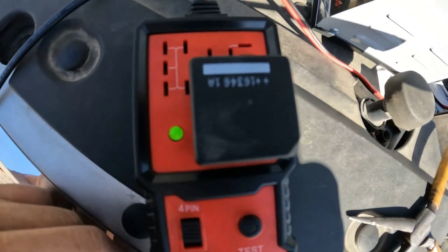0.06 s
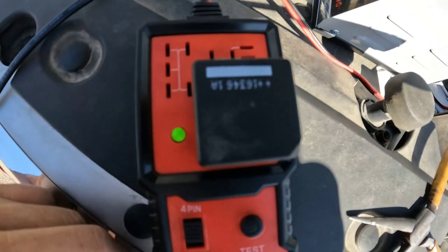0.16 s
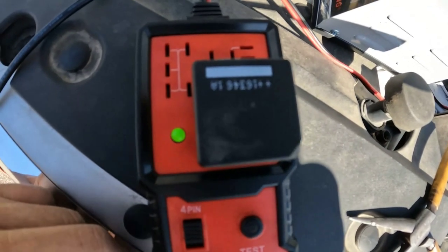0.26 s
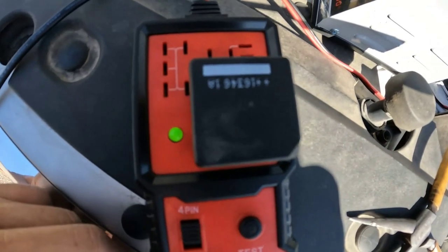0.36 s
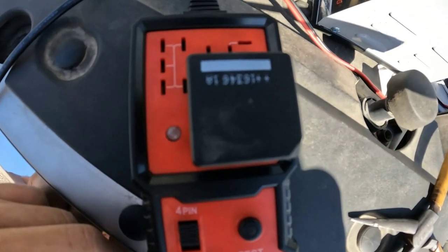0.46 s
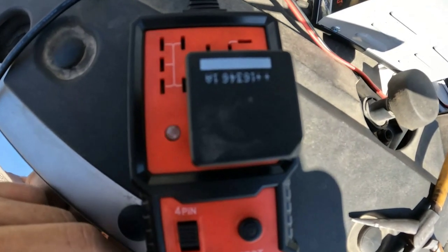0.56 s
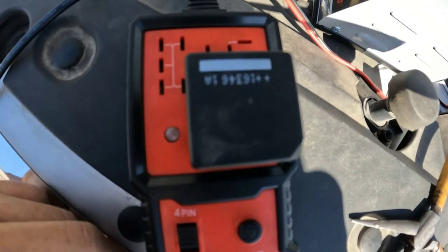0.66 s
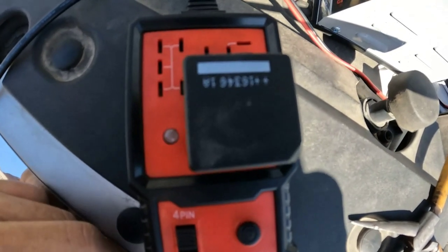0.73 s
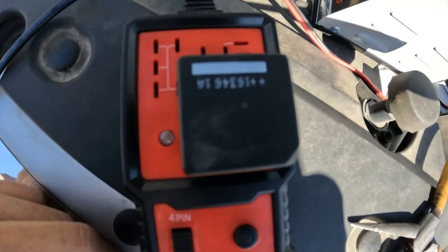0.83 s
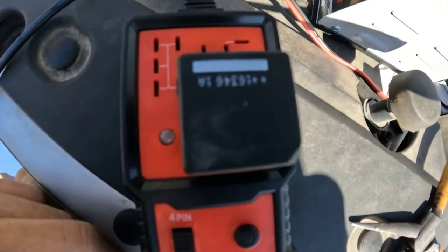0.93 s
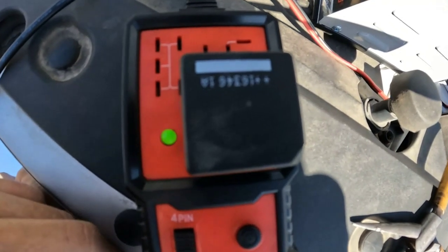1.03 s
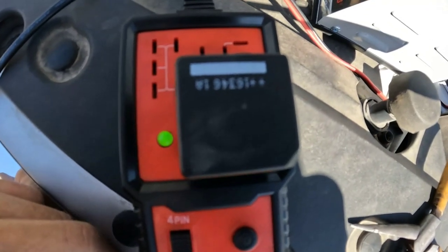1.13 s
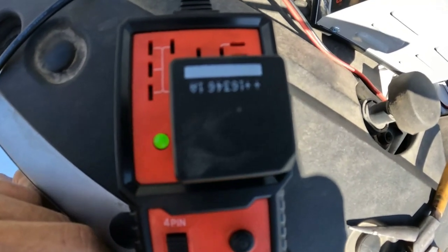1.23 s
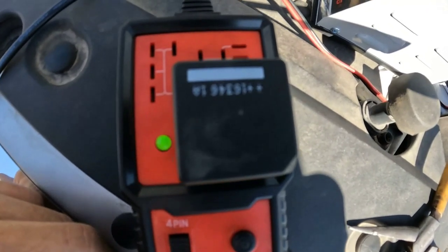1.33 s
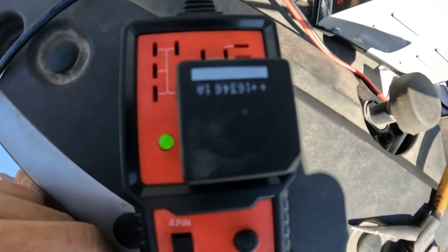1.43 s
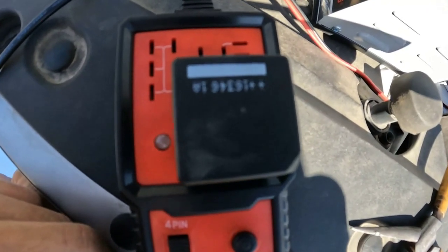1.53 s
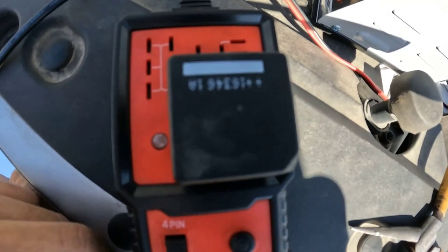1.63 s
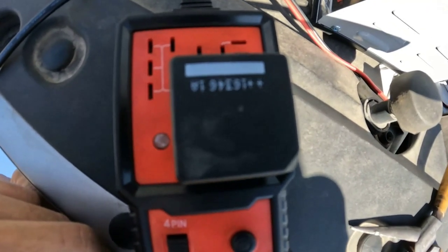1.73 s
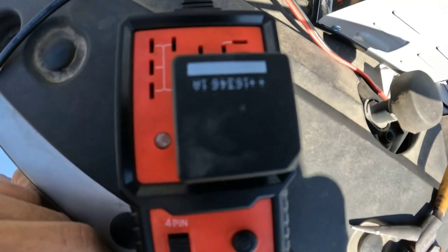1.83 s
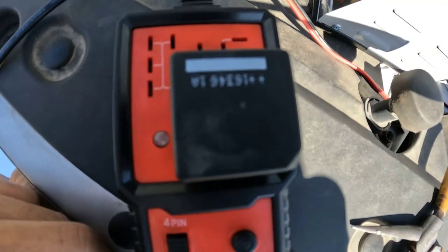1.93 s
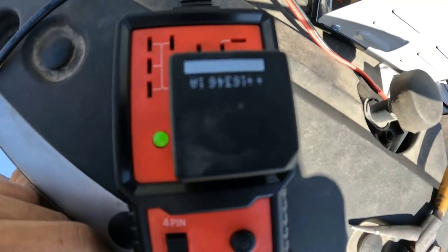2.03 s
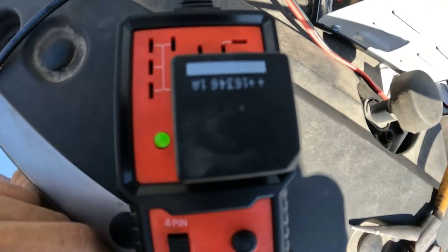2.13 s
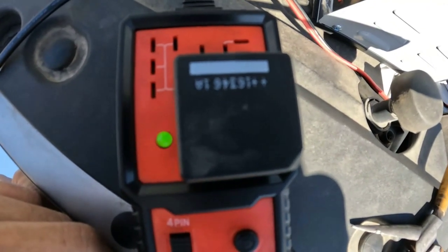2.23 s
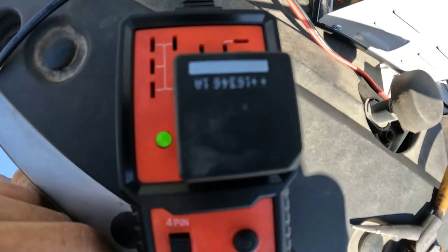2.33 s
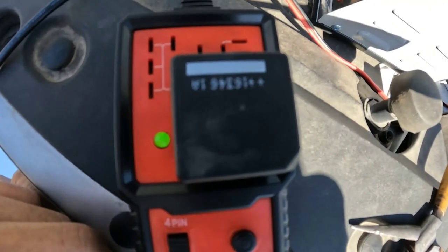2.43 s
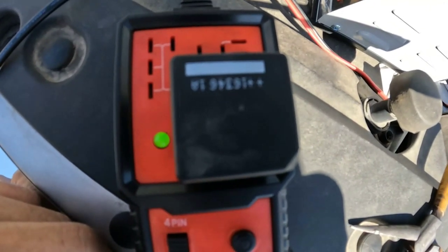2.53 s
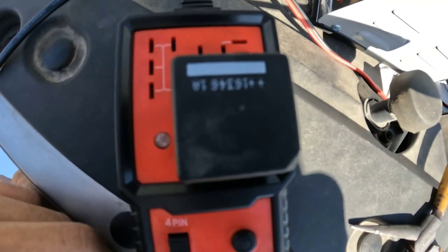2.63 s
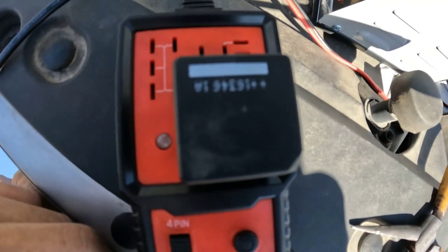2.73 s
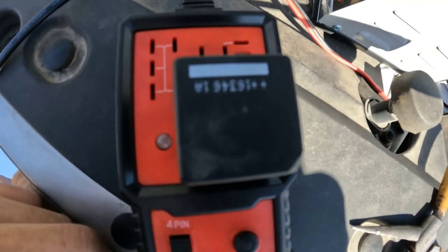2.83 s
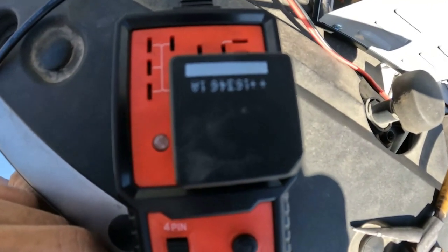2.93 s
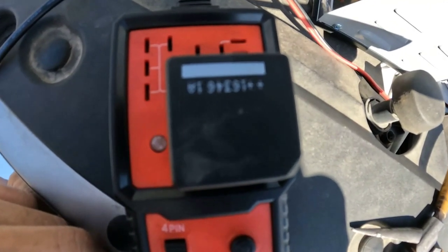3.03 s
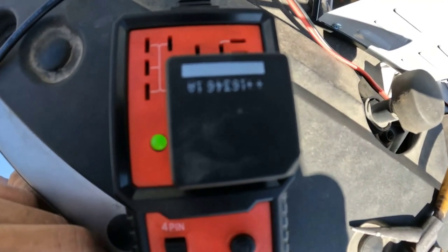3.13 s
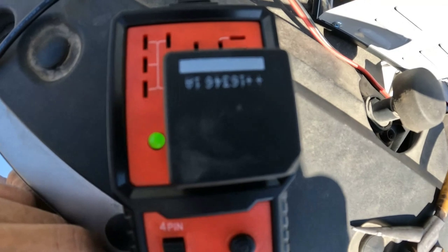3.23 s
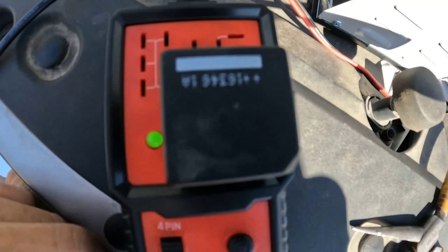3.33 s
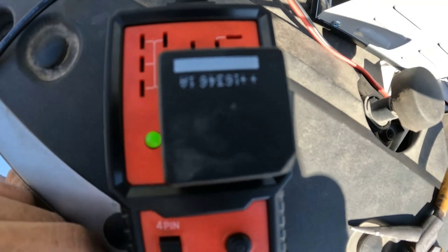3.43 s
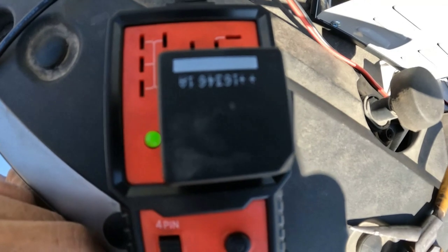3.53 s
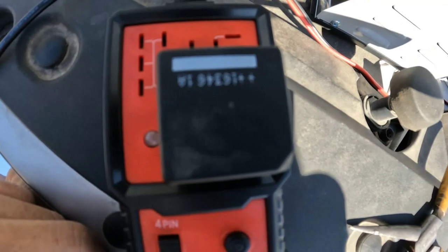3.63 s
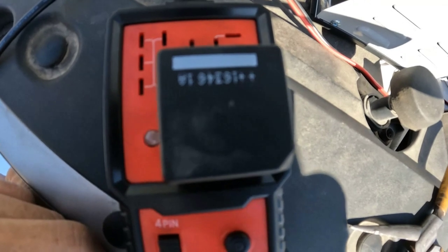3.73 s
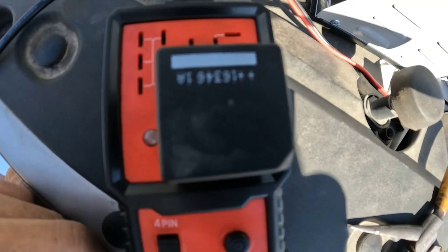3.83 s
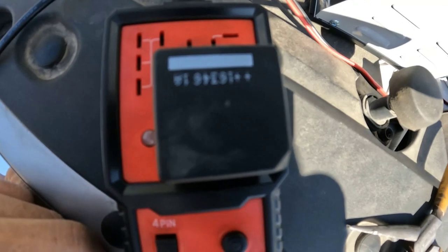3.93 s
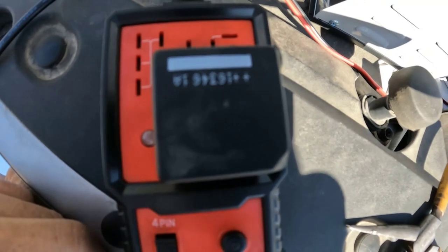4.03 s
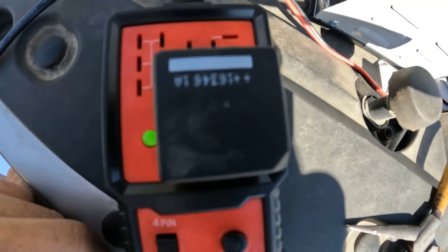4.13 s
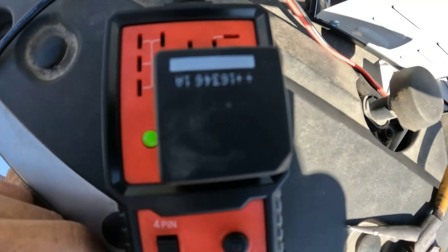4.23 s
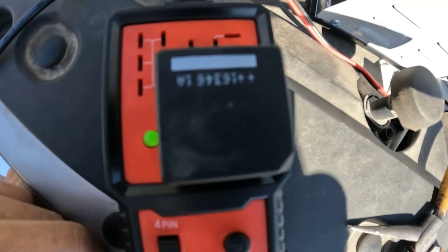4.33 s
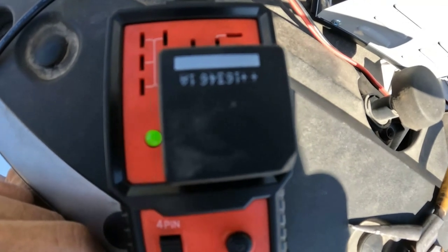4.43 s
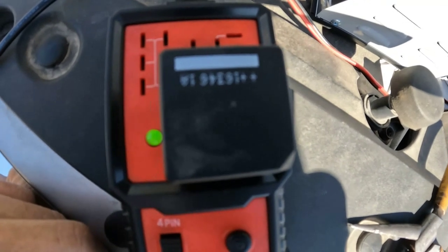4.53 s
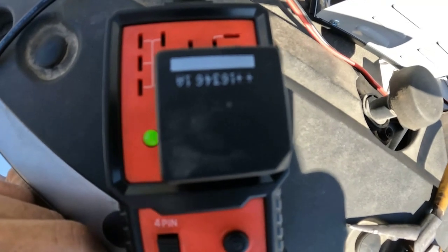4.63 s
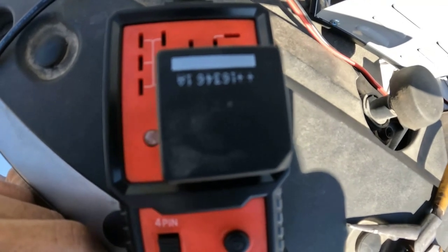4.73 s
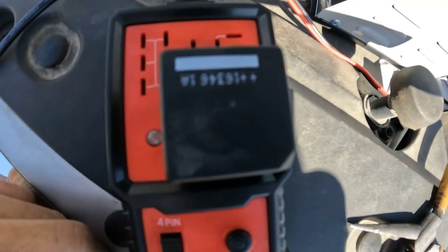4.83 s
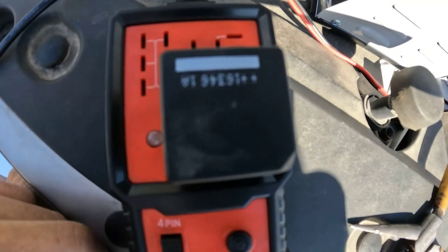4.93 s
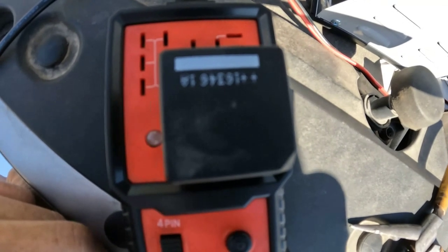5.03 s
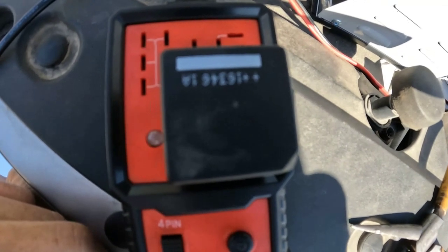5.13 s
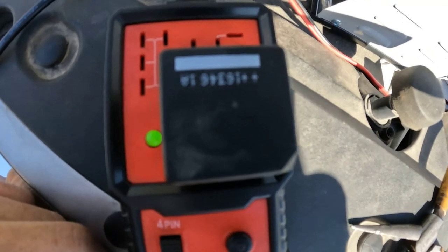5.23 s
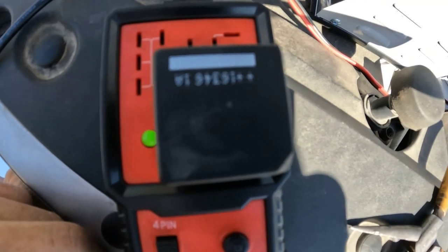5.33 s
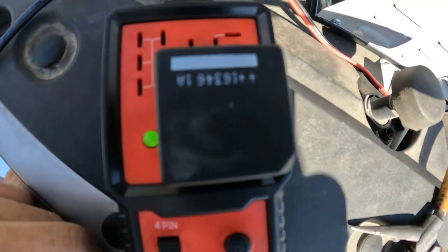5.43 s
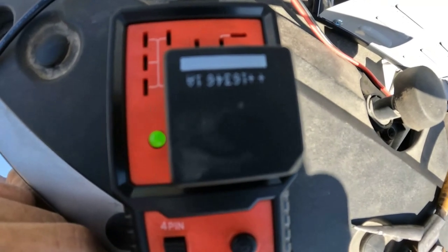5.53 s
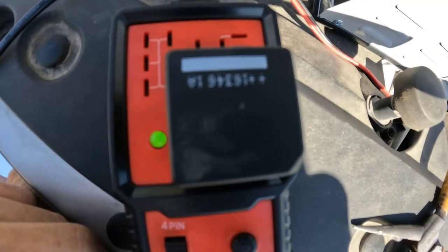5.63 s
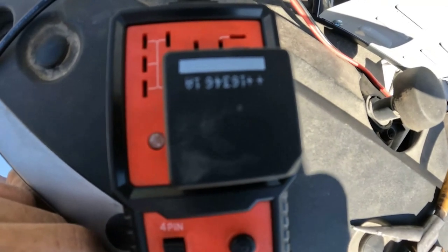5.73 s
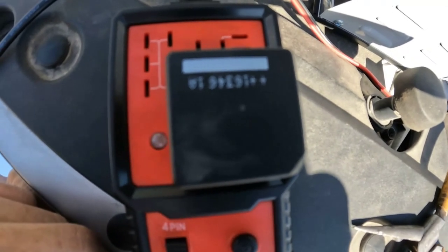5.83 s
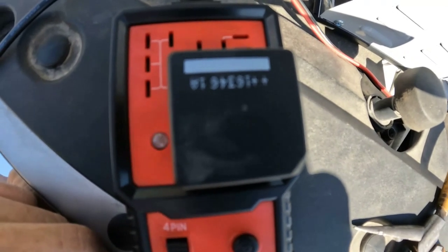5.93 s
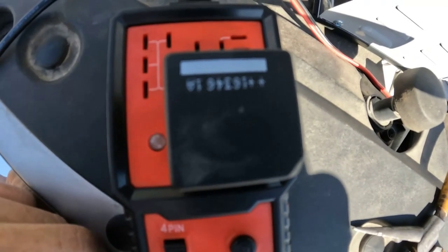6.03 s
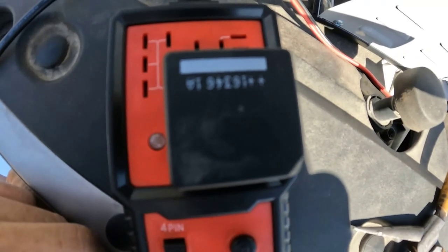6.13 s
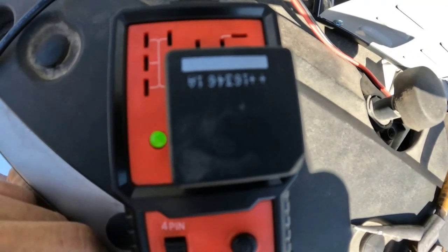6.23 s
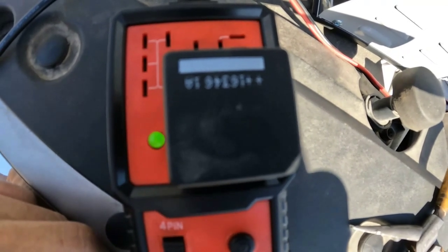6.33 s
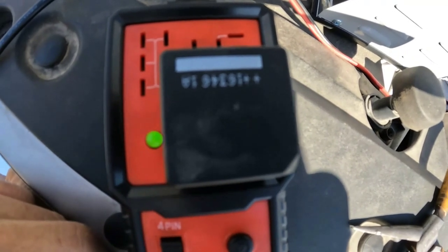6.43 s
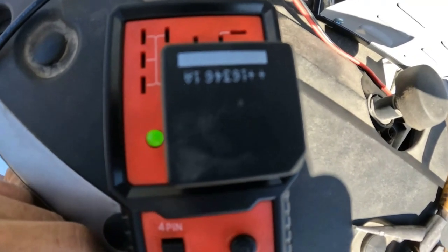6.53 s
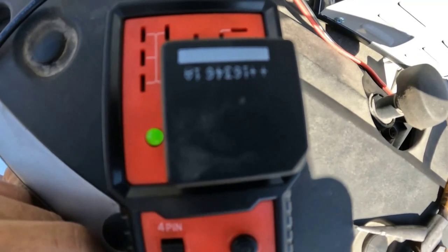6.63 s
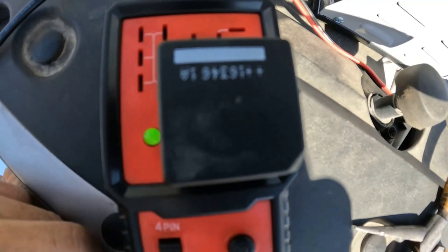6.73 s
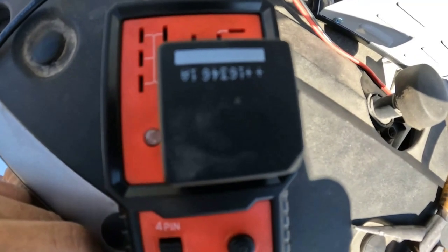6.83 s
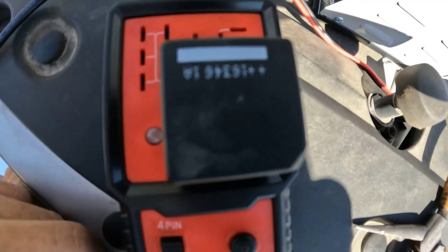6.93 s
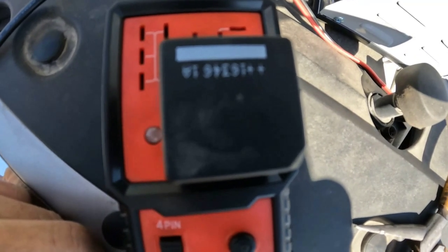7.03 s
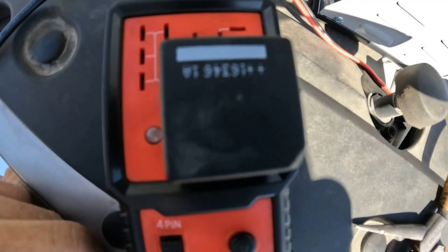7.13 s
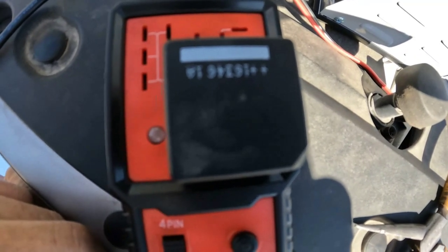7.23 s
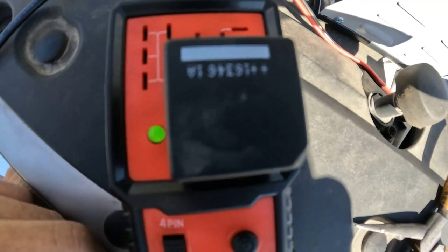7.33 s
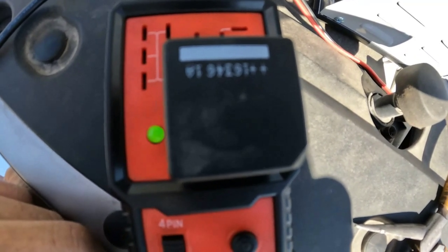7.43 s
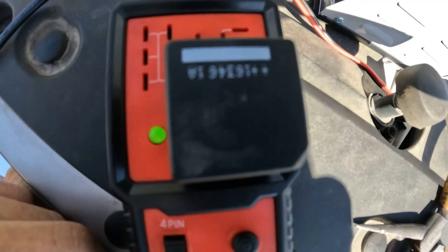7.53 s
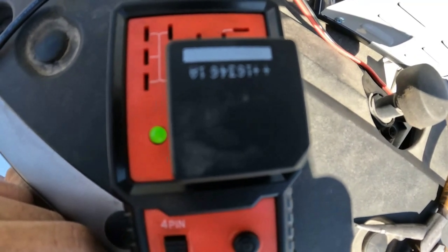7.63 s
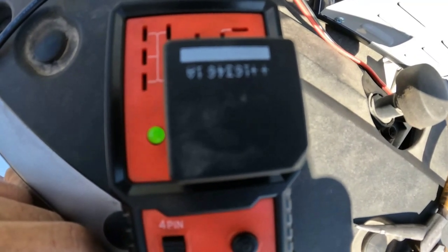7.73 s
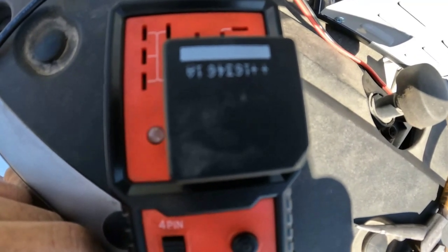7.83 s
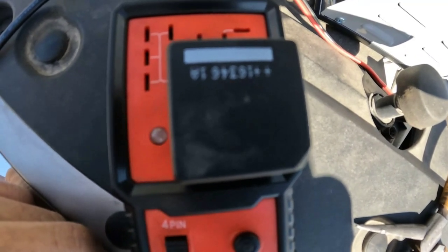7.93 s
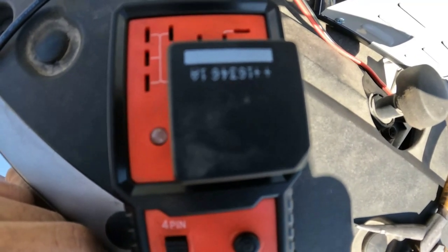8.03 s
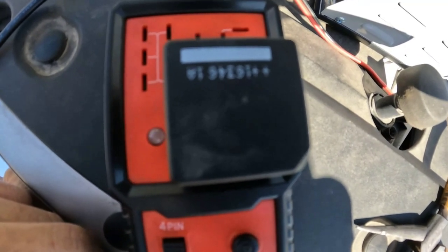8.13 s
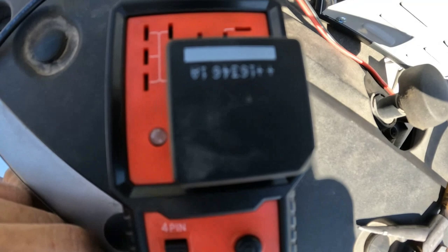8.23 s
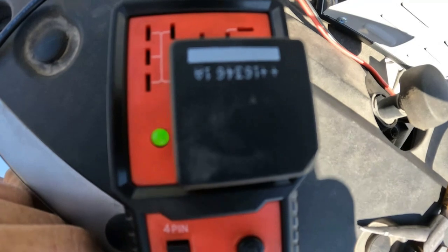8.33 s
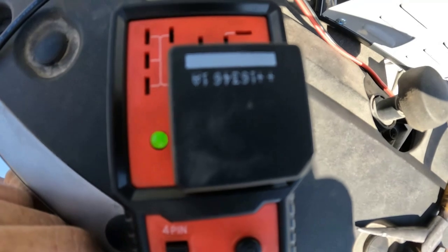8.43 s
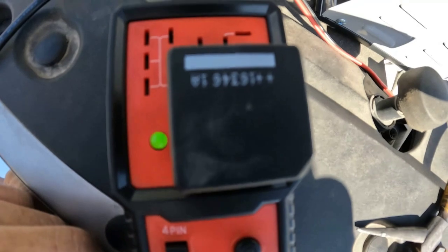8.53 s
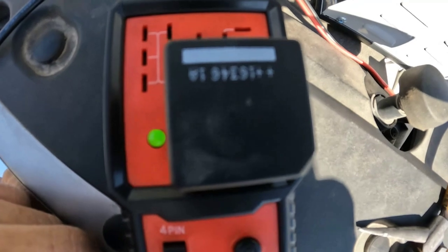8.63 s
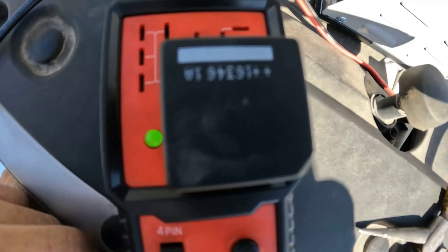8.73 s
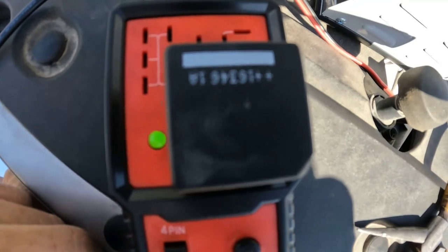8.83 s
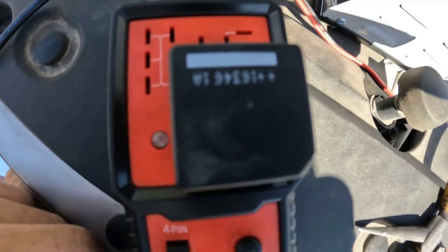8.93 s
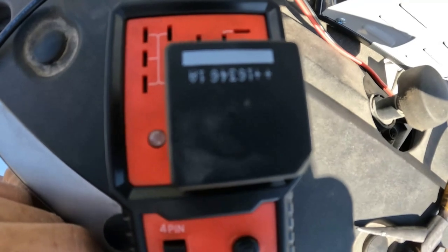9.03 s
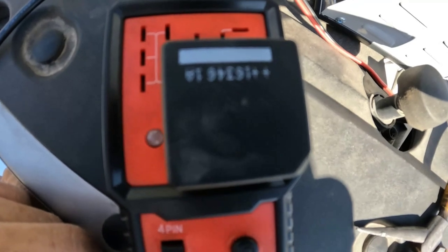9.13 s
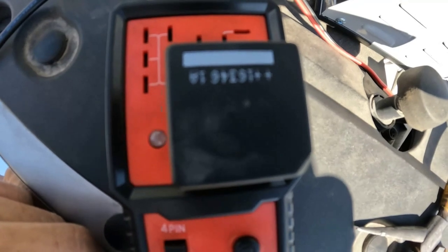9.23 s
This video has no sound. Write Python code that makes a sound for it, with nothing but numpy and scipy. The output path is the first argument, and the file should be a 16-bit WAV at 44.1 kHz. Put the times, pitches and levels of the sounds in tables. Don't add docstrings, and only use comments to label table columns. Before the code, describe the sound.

A relay in a hand-held tester ticks like a steady clock, alternating crisp springy pull-in snaps and lower knocking releases, each a tight cluster of tiny impacts. Low wind buffeting comes and goes around it, with soft heaves, puffs and heavy pops on the microphone. A low motor hum stops early, a vehicle passes faintly near three seconds, and distant yard noise stays barely audible. Close stereo phone pickup, dry open air.

```python
import sys
import numpy as np
from scipy import signal
from scipy.fft import rfft, irfft
from scipy.io import wavfile
from scipy.ndimage import uniform_filter1d

SR = 44100
rng = np.random.default_rng(int(sys.argv[2]) if len(sys.argv) > 2 else 0)


def volts(x):
    e = np.asarray(x, float) / 20
    return 10 ** e


def materialize(psi):
    bounded = np.clip(np.atleast_2d(psi).T, -1, 1)
    quanta = np.round(bounded * 32767).astype(np.int16)
    wavfile.write(sys.argv[1], SR, quanta)


N = 408807
T = np.arange(N) / SR
OPPOSITE = np.array([[1], [-1]])

FIRST_PULL_S, FIRST_DROP_S, CYCLE_S = .0919, .62395, 1.04785
LEAD_IN_S = .04
BREEZE_FLUTTER_DB, BREEZE_WANDER_DB = -9, 3.0
RISE_SHARE, EDDY_EDGE = 0.41, 5
YARD_DB = -58
THIN_FROM_HZ, BANDS_LOST, LINES_LOST_DB = 4000, .12, -5
TOP_HZ = 13000

# delay_ms, box_db, case_db, spring_db, contact_ms
PULL_BLOWS = [
    (0, -31.7, -1.8, -10.2, 0.044),
    (0.756, -50, -8.7, -9, 0.05),
    (1.722, -50, -11, -5, 0.053),
    (2.966, 3.1, -19.6, -12, 0.113),
    (4.285, -50, -16.6, -32, 0.026),
    (6.488, -10, -23.1, -23, 0.087),
]
DROP_BLOWS = [
    (0.059, -22.7, -5.7, -14.9, 0.092),
    (1.268, -50.0, -43.9, -12.0, 0.063),
    (2.23, -26.1, -14.5, -2.1, 0.106),
    (3.251, -0.1, -43.0, -1.0, 0.116),
    (5.319, 2.6, -19.0, -13.6, 0.133),
    (6.626, 3.0, -15.1, -35.1, 0.11),
]
# pitch_hz, pull_db, drop_db, t60_s
BOX_MODES = [(442, -38.5, -27, 0.04), (507, -33.1, -35, 0.024), (720, -23.3, -22.5, 0.019),
             (821, -43.8, -59.8, 0.0031), (885, -28, -24.5, 0.003)]
CASE_MODES = [(1168, -47.3, -65.0, 0.0599), (1286, -40.2, -18.9, 0.0399), (1447, -64.6, -16.3, 0.0393),
              (1616, -30.2, -13.3, 0.0196), (1781, -44.3, -35.8, 0.0599), (2033, -25.9, -22.7, 0.0598),
              (2162, -17.7, -64.0, 0.0138), (2760, -64.8, -34.5, 0.0596), (2955, -20.6, -65.0, 0.0117),
              (3324, -11.9, -15.8, 0.0183), (3578, -37.6, -30.5, 0.0545), (3953, -28.1, -64.6, 0.0105),
              (4254, -41.0, -65.0, 0.0333), (4663, -35.8, -25.9, 0.0266)]
SPRING_MODES = [(5775, -7.8, -28.5, 0.0115), (5524, -60, -38, 0.05), (6620, -19, -29.6, 0.0056),
                (7038, -60, -17.3, 0.0074), (7515, -23.8, -17.6, 0.0068), (7858, -18, -31.9, 0.017),
                (8544, -10.3, -28.9, 0.0039), (9117, -33, -15.3, 0.0038), (10138, -23, -44.8, 0.011),
                (11148, -27, -27, 0.0093), (11950, -15, -17, 0.01), (12906, -25.2, -30, 0.009),
                (14746, -18, -20.8, 0.0044), (9520, -25, -50, .009)]
# pitch_hz, pull_db, drop_db, t60_s
AFTER_RING = [(1225, -55, -47.5, .35), (2208, -43.5, -50, .15), (2764, -56, -44, .1), (3014, -45, -62, .12),
              (3100, -51, -62, .11), (3251, -43.5, -52, .08), (4548, -57, -64, .1), (6228, -48, -62, .11),
              (1819, -48, -48, .14), (4618, -57, -64, .1), (4495, -70, -54, .1), (2417, -64, -52, .09),
              (1620, -66, -52, .1), (478, -43, -37, .11)]
# freq_hz, level_db (per Hz)
RATTLE = [(240, -30), (430, 0), (800, -15), (2280, -16), (2770, -22), (3260, -14), (4130, -21),
          (14000, -46)]
# start_s, peak_db, ring_share (0 to 1)
TICKS = [
    (0.27, -48.5, 0.5),
    (0.8994, -49.5, 0.56),
    (2.28, -51, .05),
    (9.155, -52, .1),
]
# pull_hz, drop_hz
SWITCH_TOP = [(17000, 15500), (17000, 14200), (16000, 15000), (17000, 15500), (17000, 14500),
              (17000, 15200), (16500, 14400), (17000, 13800), (13900, 11500)]
# timer_slip_ms, spring_ring_db, top_db, pull_haze_lag_ms, drop_haze_lag_ms
CYCLES = [(0, 0.5, 4, -3, -4), (-.04, 0.5, -11, -1, -4), (-.07, -0.5, -2, -3, -4),
          (-.11, -0.5, -1.5, 1.5, -4.5), (-.14, -5, -4.5, -5.5, 3), (-0.085, 1.5, 1, -3, -4.5),
          (-.02, 2.5, -2, -7, -5.5), (.02, 0, 0, -9, -7.5), (.05, 0, -2.5, -9, -5.5)]
# freq_hz, left_minus_right_db, left_lead_rad
PORTS = [(300, -3.3, .1), (900, -2.5, .13), (1700, -1.8, -.05), (2900, -3.5, -.75), (3500, -1.2, -.5),
         (5700, 0, -.48), (8000, -.3, -.1), (12500, 4.5, .6)]

# time_s, level_db
BREEZE = [(0, -41.5), (1.3, -43.5), (1.65, -38), (2.45, -45), (2.82, -36), (2.9, -30), (3.5, -27.5),
          (3.75, -39), (3.9, -41), (5.3, -43), (5.66, -27), (5.93, -27), (6.05, -37.5), (6.6, -43.5),
          (6.95, -51), (7.6, -47), (7.8, -38.5), (9.27, -38.5)]
# crest_s, crest_db, length_s, flutter_db (over the heave)
EDDIES = [(0.329, -33.5, 0.068, -27), (0.505, -34, 0.043, -25.5), (0.938, -33.5, 0.05, -14),
          (1.14, -36.5, 0.13, -13), (1.379, -20, 0.034, -1.5), (1.469, -29.5, 0.083, -6),
          (1.613, -35.5, 0.15, -1.5), (1.978, -26.5, 0.08, -7), (2.155, -39, 0.28, -9),
          (3.199, -36, 0.056, -9), (3.547, -31.5, 0.052, 0.5), (3.672, -30, 0.17, -1.5),
          (4.28, -33, 0.076, -6), (4.416, -31.5, 0.058, -6), (4.66, -33, 0.066, -6.5),
          (4.96, -35, 0.14, -7), (5.193, -36, 0.042, 0), (5.672, -25.5, 0.1, -2), (5.831, -26, 0.042, -5),
          (5.958, -31.5, 0.044, -13), (6.168, -30, 0.17, -19), (6.404, -32, .11, -18.5),
          (6.528, -32, 0.047, -8), (7.088, -40.5, 0.17, -11.5), (7.379, -41.5, 0.17, -11.5),
          (7.788, -30.5, 0.15, -12.5), (8.135, -17.5, 0.043, -15), (8.244, -27, 0.21, -2),
          (8.822, -23.5, 0.072, -18), (9.049, -23, 0.28, -0.5)]
# start_s, peak_db, pitch_hz
PUFFS = [(0.509, -29, 149), (1.384, -17, 151), (1.471, -23.5, 155.5), (1.957, -17, 196), (2.884, -36, 160),
         (2.989, -19, 147), (3.093, -20.5, 214), (3.179, -18.5, 168), (3.267, -24, 254),
         (3.417, -21.5, 190.4), (3.681, -33.5, 292.7), (4.184, -29, 166.4), (4.877, -21, 172.5),
         (5.505, -27.5, 148), (5.565, -27.5, 257), (5.583, -18, 172), (5.654, -29.5, 146),
         (5.689, -17.5, 230), (5.768, -16, 111), (6.182, -25.5, 162), (6.429, -24, 165.3),
         (8.198, -14.5, 232), (8.267, -40, 164.2), (8.714, -26.5, 158), (8.835, -28.5, 194.8),
         (8.94, -38, 153.5), (9.033, -11.5, 146), (9.06, -13, 149), (9.117, -23.5, 152),
         (9.155, -11.5, 148.6), (1.405, -26, 150), (8.15, -23.5, 198), (8.23, -19.5, 198),
         (9.2, -22.5, 151), (3.345, -22.5, 85.4), (3.413, -19.5, 65.5), (3.655, -21, 65.6),
         (8.84, -17.5, 70.3), (8.278, -17, 130)]
# start_s, peak_db, pitch_hz
POPS = [(0.764, -40, 600), (3.684, -41, 560), (5.656, -34, 406), (5.69, -21.5, 357), (8.202, -29.5, 382),
        (9.156, -19.5, 382), (3.097, -31.5, 330), (3.183, -29.5, 320)]
# freq_hz, level_db
HEAVE = [(12, -11.0), (25, -2.5), (55, -2.0), (100, -6), (140, -18), (200, -41.5)]
FLUTTER = [(70, -25.0), (115, -4.5), (170, -10.0), (260, -17.5), (400, -31.5), (600, -45.5)]

# freq_hz, level_db (per Hz)
YARD = [(76, -36.5), (130, -2), (193, -5), (242, -13.5), (297, -3.5), (319, -16.5), (366, -14),
        (399, -14.5), (646, -16), (822, -31.5), (1330, -23.5), (1640, -27.5), (1880, -27), (2200, -36.5),
        (8000, -57), (8700, -69), (12000, -82), (17600, -120)]
# freq_hz, level_db
FLICKER = [(2500, -20.5), (3600, -3.0), (4600, -5.5), (6000, -1.5), (7500, -12.0), (8500, -31.0)]
# pitch_hz, width_hz, level_db
FAN = [(1005, 18, -78), (1182, 18, -77), (1263, 14, -76.5), (1346, 37, -72.5), (1640, 14, -82.5),
       (1884, 57, -77.5), (584.5, 16, -70), (1310, 8, -77)]
# time_s, pitch_hz, level_db
HUM = [
    (0, 96.4, -39.5),
    (.6, 97.6, -41.5),
    (1.1, 97.1, -42),
    (1.25, 94.2, -46.5),
    (1.4, 95, -68),
]
# time_s, level_db
PASSER = [
    (1.8, -80.5),
    (2.3, -58.5),
    (2.7, -56.5),
    (3.0, -49.5),
    (3.4, -59.5),
    (4.0, -87.5),
]
# freq_hz, level_db
DRONE = [(250, -10.5), (400, -1.0), (520, 6.5), (700, -9.5), (1000, -7.5), (1400, -18.0)]
# crest_s, crest_db, length_s
VENTS = [
    (0.023, -69.5, 0.25),
    (0.93, -71, 0.25),
    (1.78, -83, .1),
]
# freq_hz, level_db
HISS = [(3000, -21.0), (4500, -2), (6000, 2.5), (9000, -2.5), (11500, -8.5), (15000, -7.5), (15300, -50)]


def relay():
    out = np.zeros((2, N + SR))
    rattle = colour(RATTLE)
    for k, (tops, cycle) in enumerate(zip(SWITCH_TOP, CYCLES)):
        pull_hz, drop_hz = tops
        slip_ms, ring_db, top_db, pull_lag, drop_lag = cycle
        start = k * CYCLE_S + slip_ms / 1000 - LEAD_IN_S
        pull = switch(PULL_BLOWS, 0, rattle, rattle_db=-35, rattle_t60=.09,
                      haze_db=-22.0, haze_lag_ms=pull_lag, top_hz=pull_hz)
        pull = trim(pull, 5550, 6150, ring_db)
        pull = trim(pull, 10000, 13500, top_db)
        add(out, FIRST_PULL_S + start, volts(1.09) * pull)
        drop = switch(DROP_BLOWS, 1, rattle, rattle_db=-24, rattle_t60=0.069,
                      haze_db=-17.5, haze_lag_ms=drop_lag, top_hz=drop_hz)
        add(out, FIRST_DROP_S + start, volts(0.94) * drop)
    ticks(out, rattle)
    return out[:, :N]


def switch(blows, kind, rattle, rattle_db, rattle_t60, haze_db, haze_lag_ms, top_hz):
    t = np.arange(SR // 4) / SR
    near = struck_parts(blows, kind, t) + loose_tail(kind, rattle, rattle_db, rattle_t60, t)
    near = notched(near, 1045, 26)
    bass_cut = signal.butter(4, 355, "high", fs=SR, output="sos")
    near = signal.sosfiltfilt(bass_cut, near)
    top_cut = signal.butter(6, (17000, 14500)[kind], fs=SR, output="sos")
    near = ports(signal.sosfilt(top_cut, near))
    near = hazed(near, haze_db, haze_lag_ms)
    return signal.sosfiltfilt(signal.cheby2(8, 40, top_hz, fs=SR, output="sos"), near)


def struck_parts(blows, kind, t):
    ms = t[:SR // 20] * 1000 - LEAD_IN_S * 1000
    luck = rng.standard_normal((len(blows), 2)) * [.006, .6]
    total = 0
    for part, modes in enumerate((BOX_MODES, CASE_MODES, SPRING_MODES)):
        ring = sum(volts(m[1 + kind]) * np.sin(2 * np.pi * m[0] * t) * decay(t, m[3]) for m in modes)
        if modes is SPRING_MODES:
            armature = np.sin(2 * np.pi * 5430 * t) * decay(t, 0.0045)
            ring = ring - volts((-12, -40)[kind]) * armature
        push = 0
        for blow, (slip, hard) in zip(blows, luck):
            contact_ms = blow[4]
            bump = np.exp(-((ms - blow[0] - slip) / contact_ms * 2) ** 2) / contact_ms
            push = push + volts(blow[1 + part] + hard) * bump
        total = total + signal.fftconvolve(ring, push)[:len(t)] * 2 / (np.sqrt(np.pi) * SR / 1000)
    return total


def loose_tail(kind, rattle, rattle_db, rattle_t60, t):
    since = np.maximum(t - .041, 0)
    noise = rattle[rng.integers(N // 2):][:len(t)]
    tail = volts(rattle_db) * noise * decay(since, rattle_t60)
    touch = uniform_filter1d(rng.standard_normal((8, len(t))), size=300)
    for k, (hz, pull_db, drop_db, t60) in enumerate(AFTER_RING):
        waver = 1 + .55 * unit(touch[k % 8][::1 if k < 8 else -1])
        tone = np.sin(2 * np.pi * hz * since) * decay(since, t60)
        tail = tail + volts((pull_db, drop_db)[kind]) * waver * tone
    return tail * np.minimum(since / 0.00099, 1)


def hazed(near, haze_db, lag_ms):
    short = np.hanning(SR // 70) * rng.standard_normal(SR // 70) / np.sqrt(SR / 200)
    long = signal.windows.tukey(SR // 16, .85) * rng.standard_normal((2, SR // 16)) / np.sqrt(SR / 40)
    close = signal.fftconvolve(notched(near, 5800, 4), short[None], "same", axes=1)
    near = near + volts(-21.0) * np.roll(close, -SR // 400, axis=1)
    bright = .7 * np.diff(near, prepend=0) + 0.35 * near
    wide = signal.fftconvolve(notched(bright, 5800, 8), long, "same", axes=1)
    return near + volts(haze_db) * np.roll(wide, int(lag_ms * SR / 1000), axis=1)


def ports(x):
    hz, db, lead = np.transpose(PORTS)
    f = np.log(np.arange(len(x) // 2 + 1) * SR / len(x) + 1)
    half = volts(np.interp(f, np.log(hz), db) / 2) * np.exp(.5j * np.interp(f, np.log(hz), lead))
    return irfft(rfft(x) * np.array([half, 1 / half]), len(x))


def ticks(out, rattle):
    t = np.arange(SR // 50) / SR
    scrape = 2.7 * uniform_filter1d(np.diff(rattle[:len(t) + 1]), size=10)
    shape = decay(t, 0.03) * np.minimum(t / 0.002, 1)
    for s, db, ring_share in TICKS:
        ring = ring_share * np.sin(2 * np.pi * 3250 * t)
        add(out, s, volts(db + 2) * (ring + scrape) * shape)


def wind():
    push, shake = gusts()
    sides = []
    for heave_db, flutter_db in ((-0.5, 0), (-10, -6.5)):
        heave = steady(colour(HEAVE), seconds=0.077)
        flutter = steady(colour(FLUTTER), seconds=0.03) * volts(4 * walk(35))
        heave = volts(heave_db) * push * unit(heave)
        sides.append(heave + volts(flutter_db - 2.5) * shake * unit(flutter))
    common = pan(-5.8) * sides[0] + pan(-7.5) * puffs()
    return late(common, count=-18) + sides[1] * OPPOSITE / 2


def gusts():
    s, db, length, flutter_db = np.transpose(EDDIES)[..., None]
    t = T[::64]
    away = np.abs(t - s) / (length * np.where(t < s, RISE_SHARE, 1 - RISE_SHARE))
    eddies = volts(2 * db) * np.exp(-away ** EDDY_EDGE)
    wander_db = BREEZE_WANDER_DB * walk(22)[::64]
    breeze = volts(2 * (np.interp(t, *np.transpose(BREEZE)) + wander_db))
    heave = breeze + eddies.sum(axis=0)
    flutter = breeze * volts(2 * BREEZE_FLUTTER_DB) + (eddies * volts(2 * flutter_db)).sum(axis=0)
    return np.sqrt(np.interp(T, t, heave)), np.sqrt(np.interp(T, t, flutter))


def puffs():
    out = np.zeros(N)
    for table, turns, gain_db in ((PUFFS, .7, -1.0), (POPS, .4, 1.5)):
        for s, db, hz in table:
            u = np.arange(-2, 2, hz / SR)
            lump = np.cos(2 * np.pi * u + rng.uniform(0, 6.3)) * np.exp(-(u / turns) ** 2)
            lump = lump - lump.mean() * np.hanning(len(u)) * 2
            add(out, max(s - 1.5 / hz, 0), volts(db + gain_db) * lump)
    return out


def yard():
    tilt = [(0, 1.6 * np.log2(hz / 1000)) for hz, _ in YARD]
    mid, side = colour(YARD), colour(np.add(YARD, tilt))
    patchy = volts(2.2 * walk(9)) * colour(FLICKER)
    scale = volts(YARD_DB + 4 + 0.23 * walk(2.5))
    centre = scale * mid + fan() + passer() + motor() + volts(-82.0) * patchy
    return pan(-2.1) * centre + volts(-10) * scale * side * OPPOSITE


def passer():
    drone = colour(DRONE) + .5 * band(420, 17.0)
    return volts(np.interp(T, *np.transpose(PASSER), -120, -120)) * drone


def motor():
    s, hz, db = np.transpose(HUM)
    phase = 2 * np.pi * np.cumsum(np.interp(T, s, hz)) / SR
    return np.sqrt(2) * volts(np.interp(T, s, db, right=-100)) * np.sin(phase)


def fan():
    return sum(volts(db) * band(hz, width) for hz, width, db in FAN)


def vents():
    mid, side = colour(HISS), colour(HISS)
    swell = sum(volts(db) * np.exp(-((T - s) / length * 2) ** 2) for s, db, length in VENTS)
    return swell * volts(1.5 * walk(25)) * (mid + .4 * side * OPPOSITE)


def thinned(x):
    f, _, z = signal.stft(x, SR, nperseg=2048)
    lost = rng.random((len(f) // 16 + 1, z.shape[-1] // 2 + 1)) < BANDS_LOST
    lost = np.repeat(np.repeat(lost, 16, axis=0), 2, axis=1)
    power = np.abs(z.mean(axis=0)) ** 2
    weak = power < uniform_filter1d(power, size=16, axis=0) * volts(2 * LINES_LOST_DB)
    gone = (weak | lost[:len(f), :z.shape[-1]]) & (f[:, None] > THIN_FROM_HZ)
    return signal.istft(z * ~gone, SR, nperseg=2048)[1][:, :N]


def unit(x):
    return x / np.sqrt(np.mean(x ** 2))


def colour(points):
    hz, db = np.transpose(points)
    f = np.arange(N // 2 + 1) * SR / N + 1
    gain = volts(np.interp(np.log(f), np.log(hz), db, -150, -150))
    return unit(irfft(rfft(rng.standard_normal(N)) * gain, N))


def band(hz, width):
    peak = signal.iirpeak(hz, hz / width, SR)
    return unit(signal.lfilter(*peak, signal.lfilter(*peak, rng.standard_normal(N))))


def walk(rate):
    k = int(SR / rate)
    held = np.repeat(rng.standard_normal(N // k + 1), k)
    return unit(uniform_filter1d(uniform_filter1d(held, k), k)[:N])


def steady(x, seconds):
    k = int(seconds * SR)
    return unit(x / np.sqrt(uniform_filter1d(uniform_filter1d(x ** 2, k), k)))


def decay(t, t60):
    return np.exp(-np.log(1000) * t / t60)


def notched(x, hz, q):
    return signal.lfilter(*signal.iirnotch(hz, q, SR), x)


def trim(x, lo_hz, hi_hz, db):
    sos = signal.butter(3, (lo_hz, hi_hz), "band", fs=SR, output="sos")
    return x + (volts(db) - 1) * signal.sosfiltfilt(sos, x)


def pan(db):
    return volts(np.array([[db], [-db]]) / 2)


def late(x, count):
    source = np.clip(np.arange(x.shape[1]) - count, 0, x.shape[1] - 1)
    return np.array([x[0][source], x[1]])


def add(out, s, x):
    i = int(s * SR)
    out[..., i:i + x.shape[-1]] += x[..., :out.shape[-1] - i]


def scene():
    return relay() + wind() + thinned(yard() + vents())


def band_limit(x):
    return signal.sosfilt(signal.butter(12, 16470, fs=SR, output="sos"), x)


def record(dry):
    ending = np.minimum((T[-1] - T) / .008, 1)
    dulled = signal.sosfilt(signal.butter(5, TOP_HZ, fs=SR, output="sos"), dry)
    return band_limit(ending * dulled)


dry = scene()
out = record(dry)
materialize(out)
```